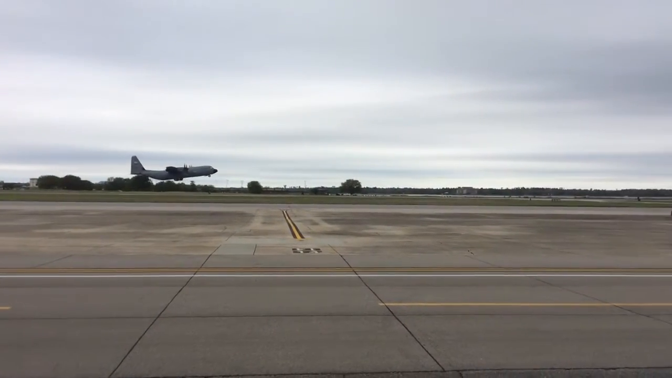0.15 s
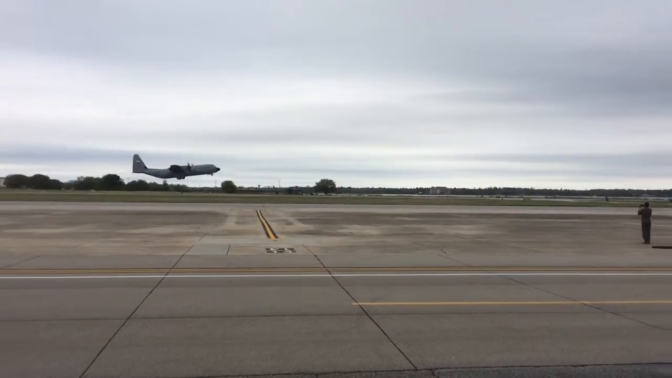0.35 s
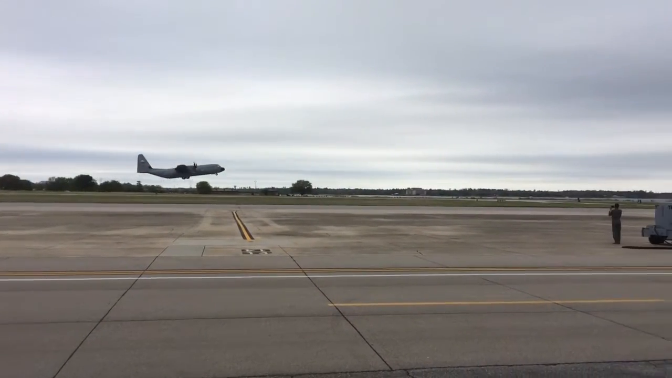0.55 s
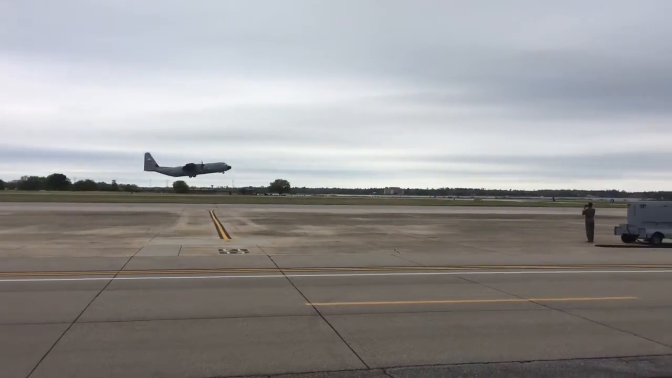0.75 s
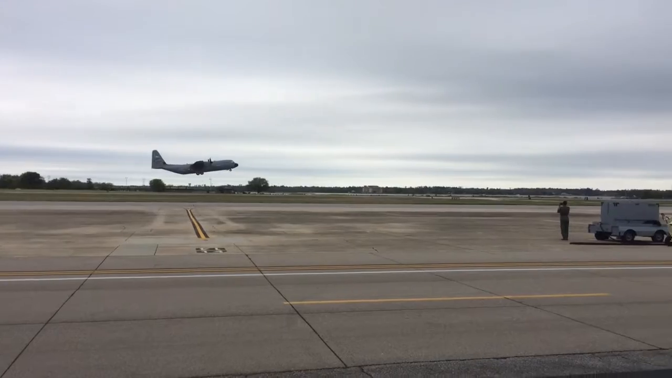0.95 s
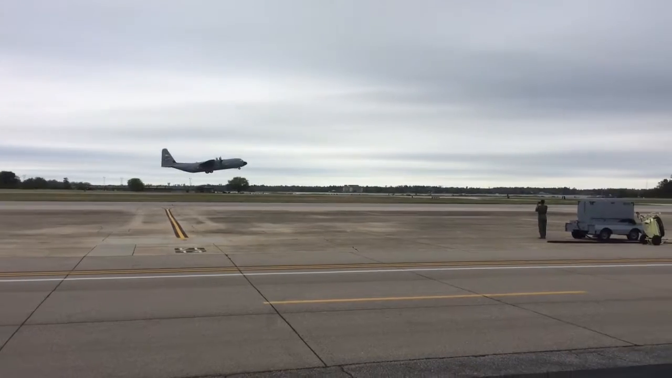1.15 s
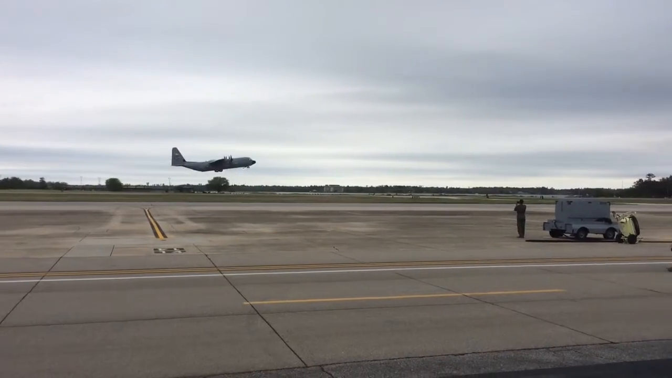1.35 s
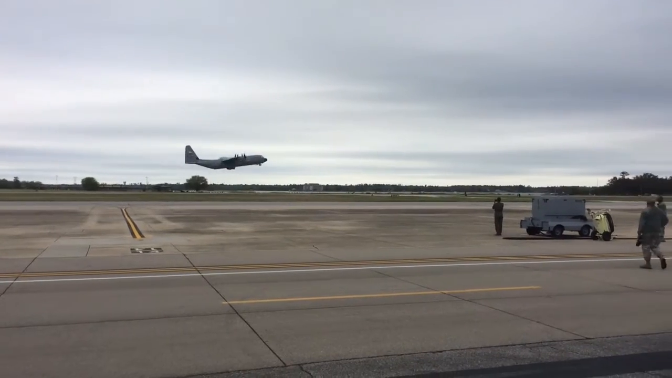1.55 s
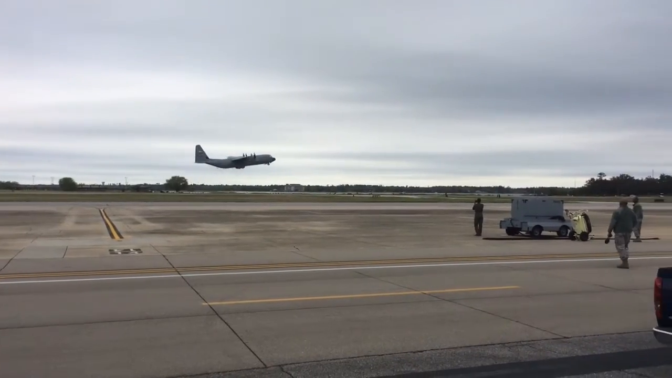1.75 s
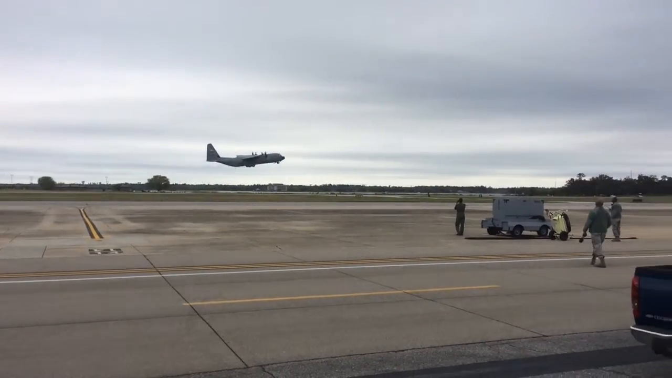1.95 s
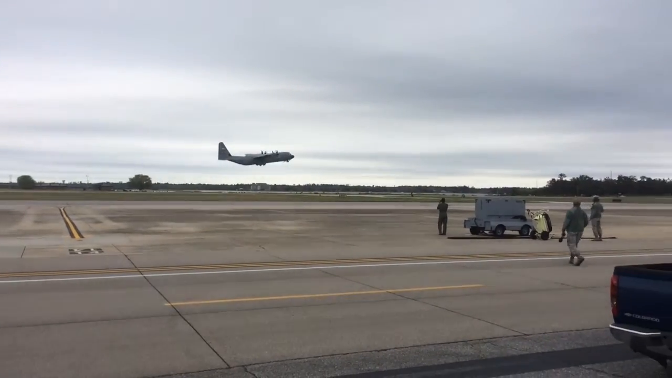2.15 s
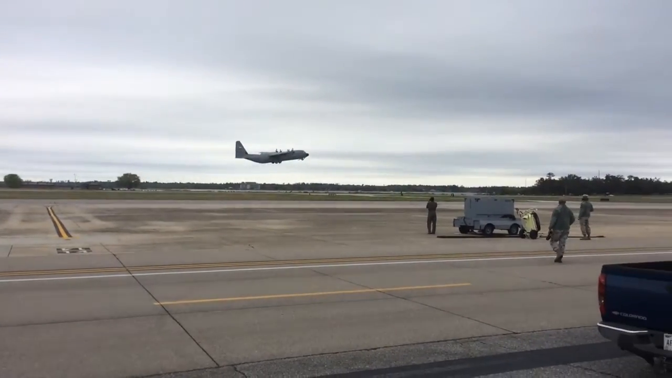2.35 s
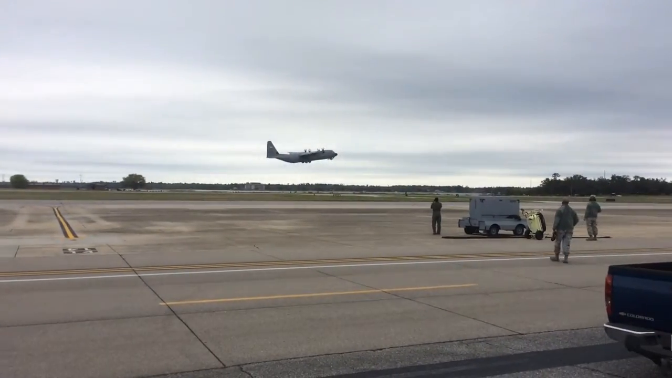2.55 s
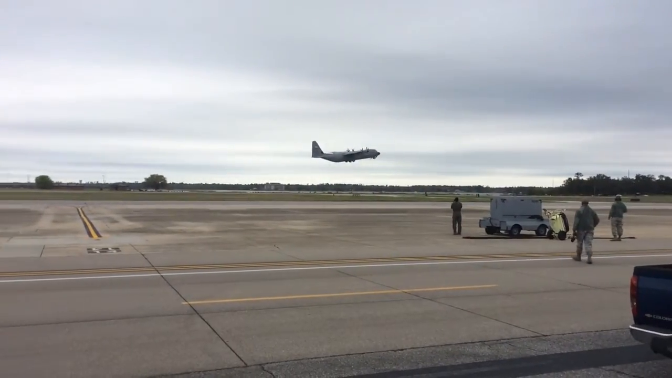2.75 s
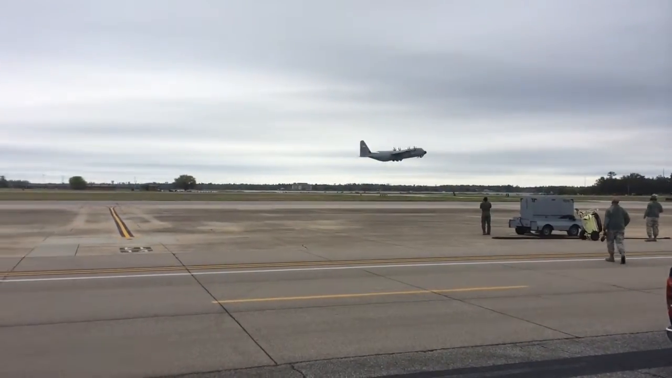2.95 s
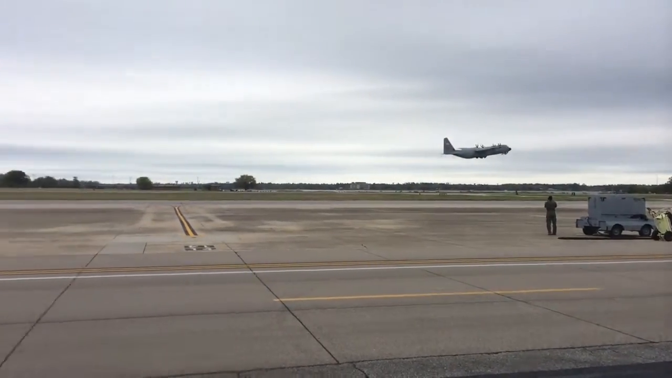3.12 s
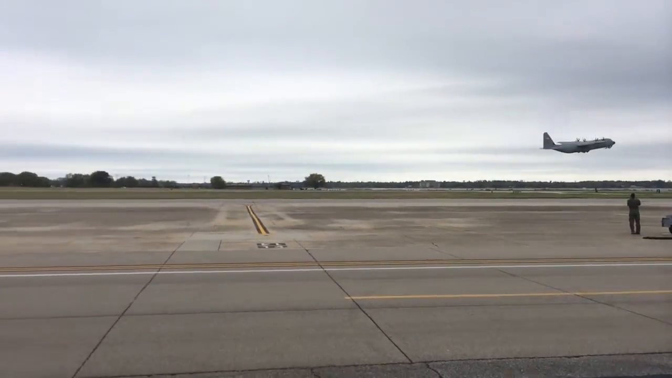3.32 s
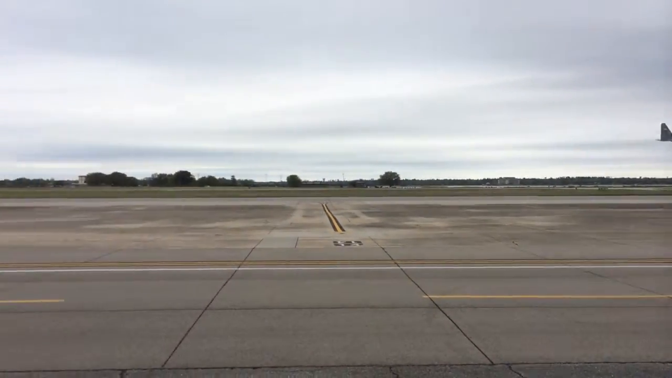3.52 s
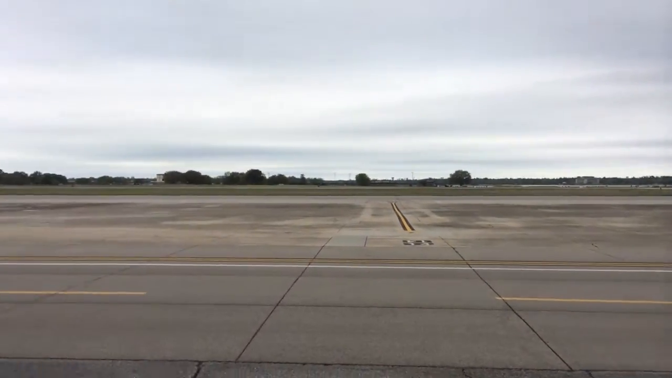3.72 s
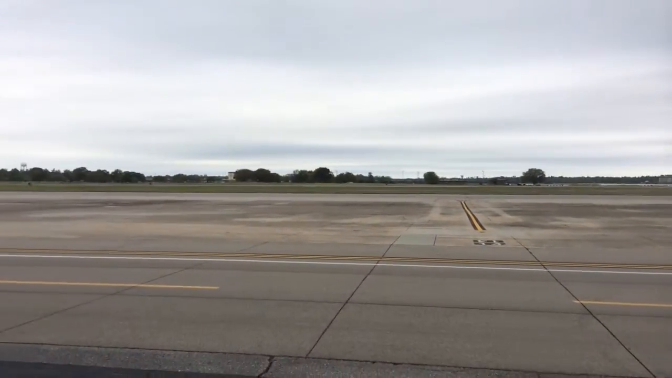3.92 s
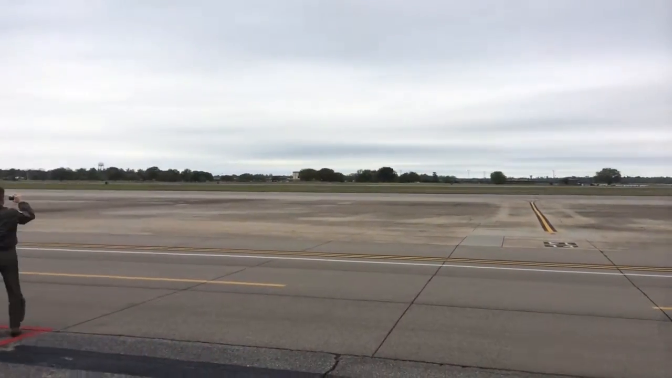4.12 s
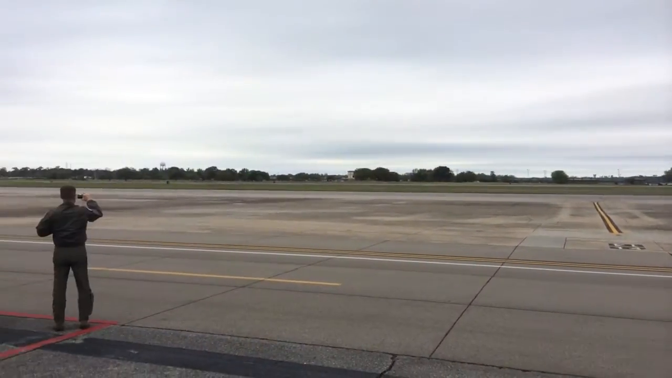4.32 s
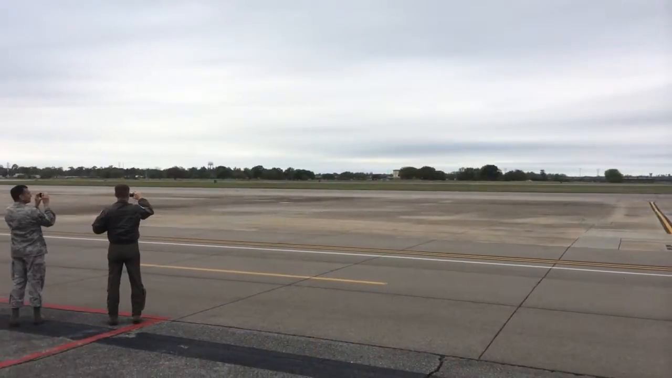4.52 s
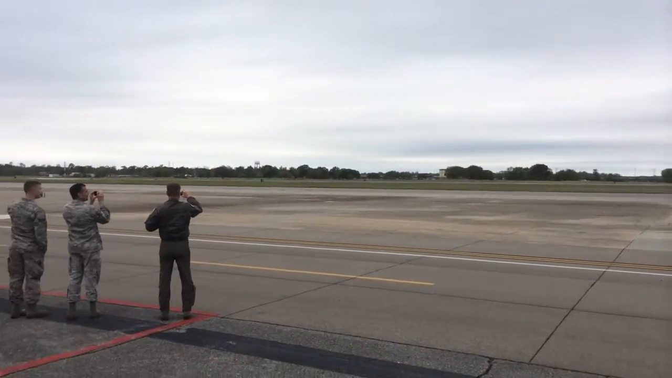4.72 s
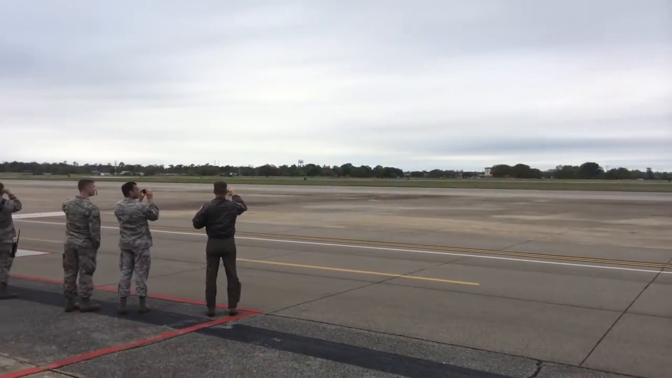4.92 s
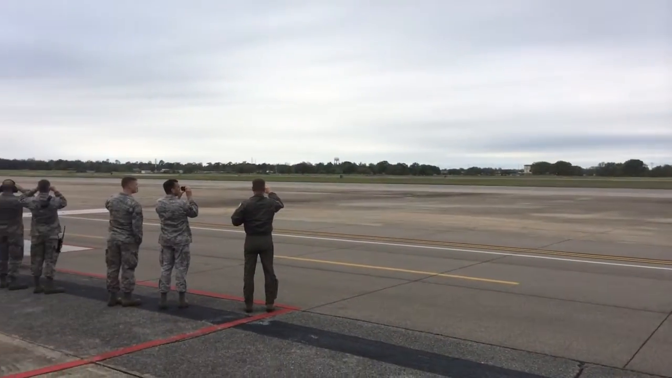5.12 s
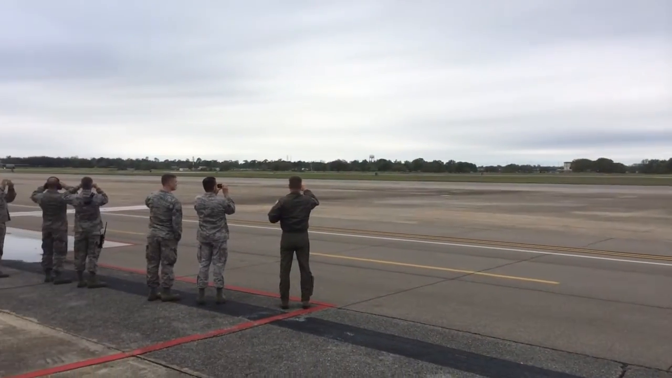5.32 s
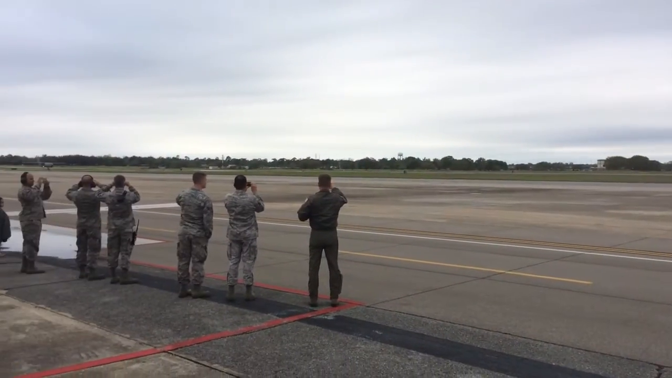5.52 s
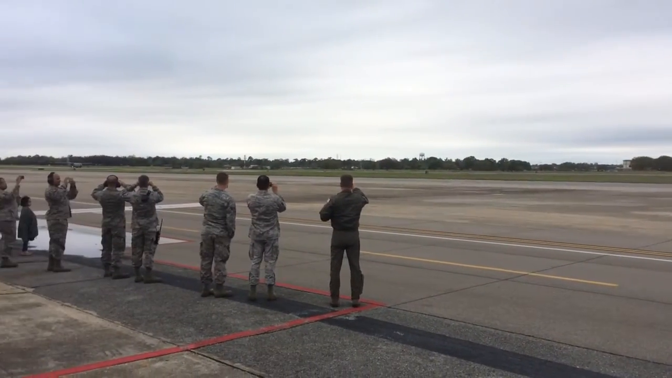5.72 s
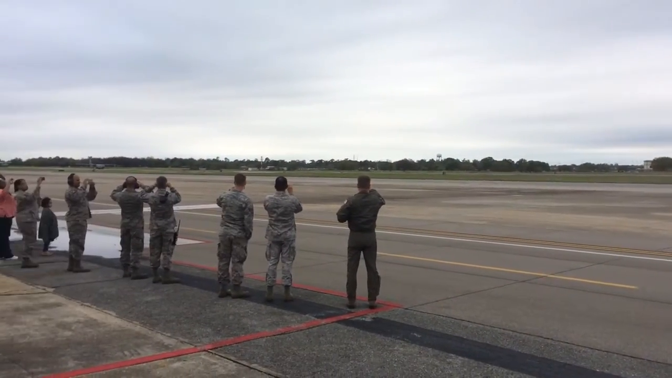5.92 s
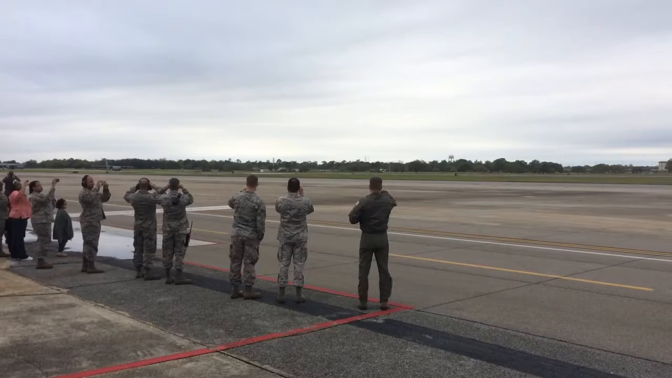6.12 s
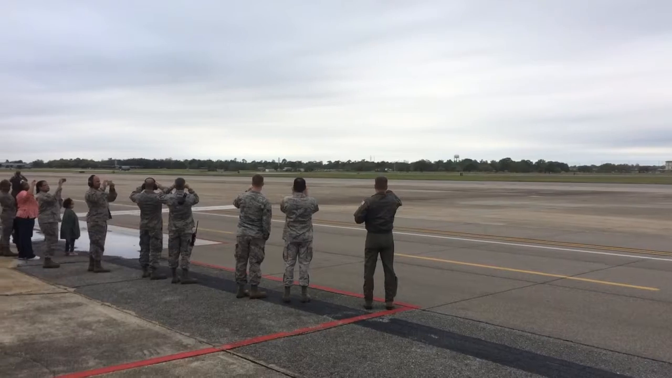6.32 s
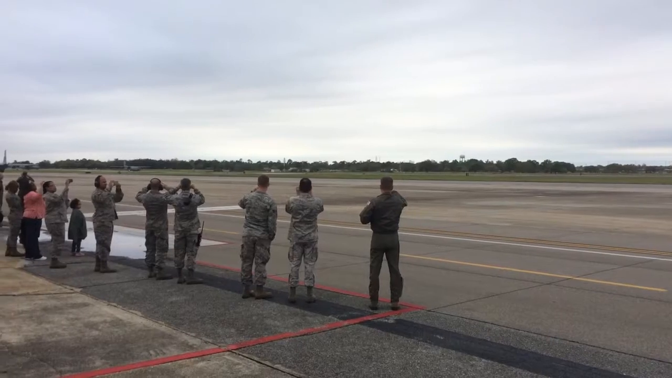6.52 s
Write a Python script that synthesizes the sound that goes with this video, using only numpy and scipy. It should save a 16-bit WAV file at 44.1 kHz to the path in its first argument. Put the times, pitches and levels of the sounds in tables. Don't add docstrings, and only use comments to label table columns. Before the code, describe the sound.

A large four-engine propeller plane passes at a distance over an open airfield. A strong low blade hum slowly drops in pitch, weakens and becomes ragged, while a breathy turbine roar with a hissy ridge swells and dips in gusts. Low wind and propeller wash rumble in lumps underneath. One faint rising chirp sounds far off early on. Handheld microphone outdoors, no echo.

```python
import sys
import numpy as np
from scipy import signal
from scipy.io import wavfile
from scipy.ndimage import uniform_filter1d

SR = 44100
rng = np.random.default_rng(int(sys.argv[2]) if len(sys.argv) > 2 else 0)


def put_to_file(sound):
    columns = np.atleast_2d(sound).T
    safe = np.clip(columns, -1, 1)
    whole_steps = np.round(safe * 32767)
    wavfile.write(sys.argv[1], SR, whole_steps.astype(np.int16))


def nominal_scale(level):
    x = np.asarray(level, float) / 20
    return 10 ** x


N = 289716

# [t/s, f/Hz]
BLADE_RATE = [(0, 108.2), (1.05, 104.3), (1.85, 100.9), (2.65, 98.5), (3.45, 96.2), (4.25, 94), (5.2, 92.8),
              (6.57, 91.5)]
# [t/s, scattered share 0-1]
AIR_SCATTER = [(0, .06), (2.2, .05), (3, .25), (3.5, .12), (4.4, .12), (4.8, .55), (6.57, .65)]


def propellers():
    # [t/s, length/s, level/dB]
    octave_swells = [(.07, 0.12, -49), (0.623, .1, -40), (.77, 0.11, -36), (1.229, 0.13, -31.5),
                     (2.34, 0.052, -35), (2.515, 0.056, -28.5), (2.63, 0.056, -32), (2.834, 0.077, -25.5),
                     (3.04, .09, -24.5), (3.312, 0.061, -35.5), (4.45, 0.074, -38), (4.84, 0.042, -35.5),
                     (5.072, 0.053, -25), (5.28, .08, -30.5), (5.46, 0.068, -25.5), (6.07, .08, -35)]
    t = np.arange(N) / SR
    blade_hz = columns(BLADE_RATE)[0]
    share = columns(AIR_SCATTER)[0]
    octave_gain = nominal_scale(-40.5)
    for start, length, db in octave_swells:
        octave_gain = octave_gain + nominal_scale(db) * bell(t, start, length)
    blade_tone = tone(blade_hz, blade_level(), share, smear_hz=9.1)
    octave = tone(2 * blade_hz, 0, 1.5 * share, smear_hz=11.0)
    return blade_tone + octave_gain * octave


def blade_level():
    # [t/s, level/dB]
    blade_curve = [(0, -15), (.17, -18.5), (.55, -16), (.75, -18.5), (.86, -13), (1.2, -12.5), (1.95, -13),
                   (2.3, -18.5), (2.6, -19.5), (2.85, -26), (3.15, -26.5), (3.58, -20), (4.4, -22.5),
                   (4.75, -27), (5.3, -23.5), (5.9, -26.5), (6.15, -29.5), (6.57, -20)]
    # [t/s, length/s, change/dB]
    fades = [(.37, 0.045, 0), (2.5, 0.061, -4), (2.743, 0.033, -1), (2.93, 0.055, -2.1), (3.2, 0.035, -12),
             (4.67, 0.04, -5.1), (4.83, 0.087, -16), (5.1, 0.15, -5.5), (5.39, 0.045, -9), (5.56, .05, -14),
             (5.838, 0.046, 0), (6.264, 0.066, -12), (6.493, 0.1, -11)]
    t = np.arange(N) / SR
    return columns(blade_curve)[0] + sum(db * bell(t, start, length) for start, length, db in fades)


def turbines():
    # [t/s, level/dB, clarity/(dB per kHz)]
    turbine_swells = [(0, 3, 0.57), (.9, 1, -0.12), (1.9, -0.45, -0.15), (2.5, 2.5, 0.76), (3.1, 2.5, 1),
                      (3.9, -3, -0.02), (4.4, -2, .4), (4.9, 2, 0), (5.5, 1, -1.5), (6.57, 3, -1.63)]
    # [f/Hz, level/dB per Hz]
    roar_spectrum = [(250, -19.5), (346, -7), (431, -8), (582, -2.5), (904, -4), (1070, -7), (1620, -3.5),
                     (2160, -5.5), (2950, -3.5), (3870, -17.5), (5150, -26), (6670, -41.5), (9200, -60),
                     (10300, -91.5)]
    # [t/s, length/s, change/dB, centre f/Hz]
    roar_gusts = [(0.161, 0.088, 2.2, 1570), (0.419, 0.074, 2.6, 6470), (0.505, 0.094, 6.1, 2250),
                  (0.722, 0.065, 1.5, 3500), (1.117, 0.061, 2, 5550), (1.205, 0.094, 8, 1897),
                  (1.362, 0.11, -2.5, 1907), (1.482, 0.051, 5, 6410), (1.56, .12, 4.5, 2680),
                  (1.7, .08, 3, 2355), (1.919, .08, 4, 572), (2.14, 0.068, 2.5, 3500),
                  (2.549, 0.15, 4.5, 454), (2.761, 0.28, -3.5, 1340), (2.799, 0.079, 1.5, 6440),
                  (2.927, 0.074, 5.2, 3530), (2.97, .1, 2, 511), (3.429, 0.14, 4, 3580),
                  (3.728, 0.12, 4, 2980), (4.161, 0.4, 5.5, 2720), (4.36, .3, -1.5, 595),
                  (4.362, 0.15, 1.5, 3260), (4.728, 0.097, 4.5, 4010), (4.94, 0.17, 4, 2940),
                  (5.107, 0.21, 2, 693), (2.25, 0.3, -2, 1198), (3.1, 0.12, -1.7, 904),
                  (5.45, 0.13, 1, 1500), (6.56, .1, 1, 2490)]
    # [t/s, centre f/Hz, height/dB]
    inlet_ridge = [(0, 2920, 5), (1, 3060, 3), (2.05, 3030, 4), (2.45, 3070, 9.1), (3, 3350, 7),
                   (3.6, 3330, 4), (4.2, 3125, 3.5), (4.9, 2890, 2), (5.5, 3020, 1.5), (6.57, 2830, 3)]
    # [t/s, centre f/Hz, change/dB]
    ground_dip = [(0, 2100, -3), (.9, 2046, -5.5), (1.9, 2106, -7.5), (2.6, 1956, -1.5), (3.3, 1946, 2.1),
                  (3.8, 1953, -5), (4.5, 2054, -5.5), (5, 2070, -3), (5.6, 2160, -2.5), (6.57, 2090, -2.5)]
    # [t/s, centre f/Hz, change/dB]
    dark_valley = [(0, 394, -1.5), (.7, 389, 2.2), (1.3, 373, -2), (2.2, 382, 1), (3, 397, 4),
                   (4.3, 416, 4.5), (5, 428, -3), (6.57, 428, -3.5)]
    bumps = ((inlet_ridge, (340, 830)), (ground_dip, (860, 480)), (dark_valley, (270, 170)))
    roar = shaped_noise(roar_spectrum, turbine_swells, 920, roar_gusts, 2.23, bumps,
                        size=512, patchy_db=1.25, flicker_db=0.13)
    return nominal_scale(-28.0) * roar


def rumble():
    # [t/s, level/dB, tilt/(dB per kHz)]
    wash_swells = [(0, -0.6, -5), (1, -2, -4.5), (2.201, -2.5, 3.5), (2.7, 0.7, 13.5), (3.6, 3, 1.5),
                   (4.499, 1.8, .3), (5.101, 0, 7.5), (5.7, -0.6, -3), (6.57, 0.5, 7.7)]
    # [f/Hz, level/dB per Hz]
    rumble_spectrum = [(15, -27.5), (30, -16.5), (55, 2.5), (75, 1), (110, 7.5), (150, 0), (200, -0.5),
                       (270, -6), (310, -6), (350, -35), (500, -62.5), (1500, -110)]
    # [t/s, length/s, change/dB, centre f/Hz]
    buffets = [(.03, 0.062, 3, 130), (0.201, 0.2, 8.5, 63.3), (0.661, 0.23, 4, 295),
               (0.879, .12, -1.5, 129.3), (0.961, 0.37, 5, 70.2), (1.22, 0.13, -2.5, 145),
               (1.34, 0.49, 7.5, 70.3), (1.661, 0.14, 5, 70.2), (2.579, 0.12, 7, 270),
               (3.171, 0.13, 8, 280), (3.3, 0.3, -2.5, 61.2), (4.22, 0.081, 3.5, 240),
               (4.731, 0.12, 6.5, 67.9), (4.958, .18, 8.5, 268), (5.22, .18, 5, 152.6),
               (5.48, 0.22, 0, 129.6), (5.54, 0.16, 4, 71.6), (5.84, .18, 2, 61.4), (6.14, 0.099, 12.5, 70),
               (6.56, 0.16, 6.5, 68)]
    lumps = nominal_scale(1.6 * drift(12.0).real)
    wash = shaped_noise(rumble_spectrum, wash_swells, 140, buffets, 1, (),
                        size=4096, patchy_db=0.5, flicker_db=-1.4)
    return nominal_scale(-27.5) * evened(lumps * wash)


def chirp():
    # [t/s, length/s, start f/Hz, end f/Hz, level/dB]
    chirp_setting = (.91, .075, 1130, 1420, -38)
    start, length, low_hz, high_hz, db = chirp_setting
    progress = np.clip((np.arange(N) / SR - start) / length, 0, 1)
    glide_hz = low_hz + (high_hz - low_hz) * progress
    return np.sin(np.pi * progress) * tone(glide_hz, db, 0.2, smear_hz=40)


def folded_overtones():
    # [overtone number, multiple of the block rate, level/dB against the strongest]
    folded_lines = [
        (3, 1, 0),
        (6, 2, -13),
        (5, 1, -15),
    ]
    block_hz = SR / 128
    blade_hz = columns(BLADE_RATE)[0]
    db = 0.85 * (blade_level() + 13.5) - 28.5
    db += 7 * np.log2((block_hz - 3 * blade_hz) / 40)
    db -= 20.5 * columns(AIR_SCATTER)[0]
    return sum(tone(overtone * blade_hz - multiple * block_hz, db + rel_db, 0.1, smear_hz=3)
               for overtone, multiple, rel_db in folded_lines)


def tone(hz, db, share, smear_hz):
    share = np.clip(share, 0, 1)
    carrier = np.sqrt(1 - share ** 2) + share * drift(smear_hz)
    turning = np.exp(2j * np.pi * np.cumsum(hz) / SR)
    return np.sqrt(2) * nominal_scale(db) * (carrier * turning).imag


def shaped_noise(shape, levels, pivot_hz, gusts, octaves, bumps, size, patchy_db, flicker_db):
    hop = size // 4
    hz = np.fft.rfftfreq(size, 1 / SR)[:, None] + 1
    t = np.arange(N // hop + 5) * hop / SR
    real, imaginary, patches = rng.standard_normal((len(t), len(hz), 3)).T
    patches = uniform_filter1d(patches, size=9, axis=0)
    patches = evened(uniform_filter1d(patches, size=9, axis=1))
    flicker = evened(uniform_filter1d(rng.standard_normal(len(t)), size=5))
    level_db, db_per_khz = columns(levels, t)
    shape_hz, shape_db = np.transpose(shape)
    field_db = np.interp(np.log(hz), np.log(shape_hz), shape_db) + level_db
    field_db += db_per_khz * (np.minimum(hz, 7.5 * pivot_hz) - pivot_hz) / 1000
    for start, length, db, centre_hz in gusts:
        field_db += db * bell(t, start, length) * bell(np.log2(hz), np.log2(centre_hz), octaves)
    for rows, width_hz in bumps:
        centre_hz, db = columns(rows, t)
        field_db += db * bell(hz, centre_hz, np.linspace(*width_hz, len(t)))
    field_db += patchy_db * patches + flicker_db * flicker
    spectra = (real + 1j * imaginary) * nominal_scale(field_db)
    return evened(signal.istft(spectra, nperseg=size, noverlap=size - hop)[1][:N])


def drift(hz):
    z = rng.standard_normal((N, 2)) @ [1, 1j]
    return evened(signal.sosfilt(signal.butter(2, hz, fs=SR, output="sos"), z))


def bell(x, centre, width):
    return np.exp(-2 * ((x - centre) / width) ** 2)


def evened(x):
    return x / np.sqrt(np.mean(abs(x) ** 2) + 1e-20)


def columns(rows, t=None):
    times, *values = np.transpose(rows)
    if t is None:
        t = np.arange(N) / SR
    return np.array([np.interp(t, times, v) for v in values])


def scene():
    return (propellers() + turbines() + rumble() + chirp())[None]


def top_cut(x):
    return signal.sosfilt(signal.butter(12, 15290, fs=SR, output="sos"), x)


def record(dry):
    # [t/s, level/dB]
    self_noise = [(0, -88), (1.5, -89), (2.6, -84.5), (4, -83.5), (6.57, -81.5)]
    hiss = nominal_scale(columns(self_noise)) * rng.standard_normal(dry.shape)
    return top_cut(dry + folded_overtones() + hiss)


dry = scene()
out = record(dry)
put_to_file(out)
```